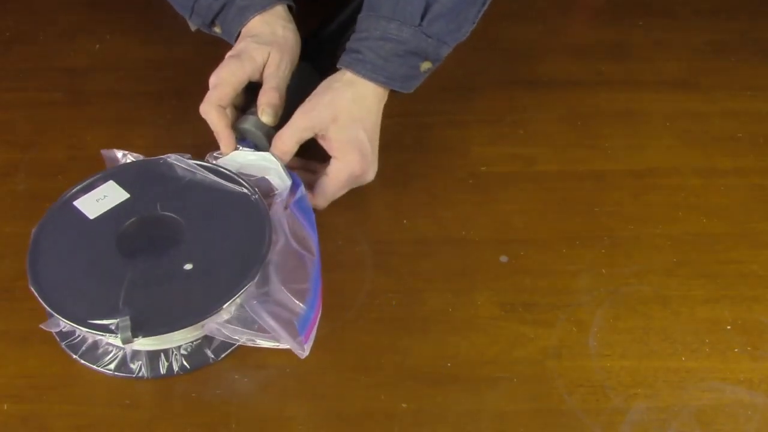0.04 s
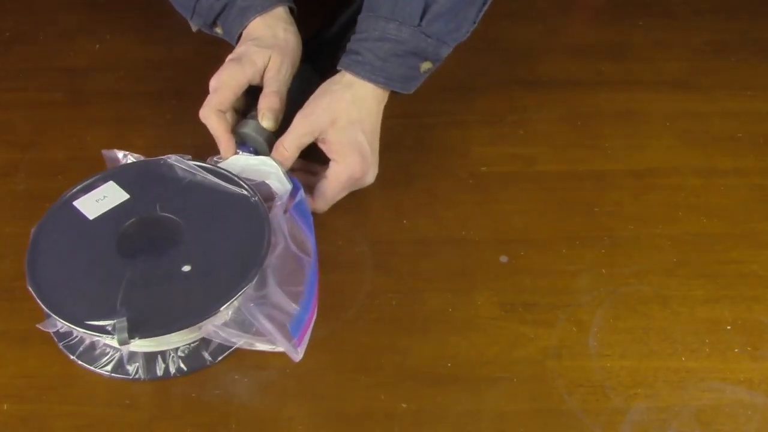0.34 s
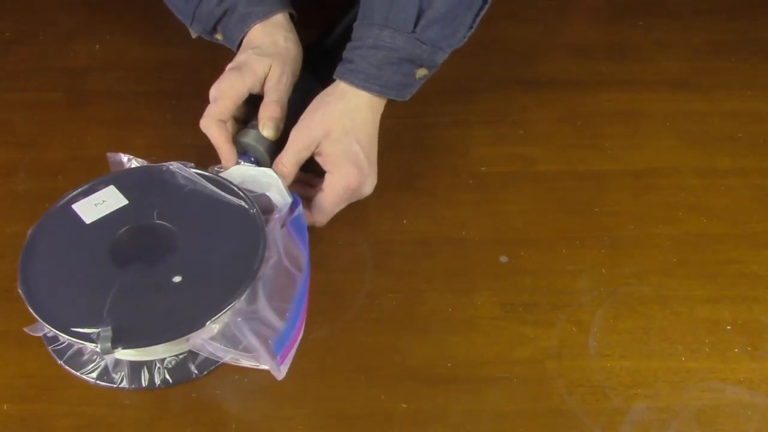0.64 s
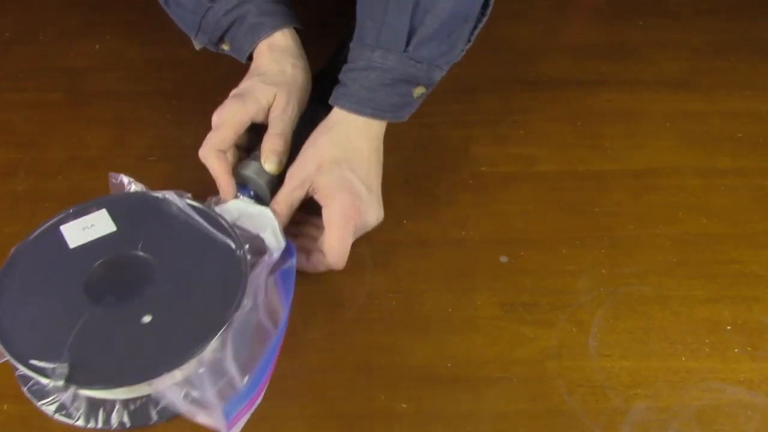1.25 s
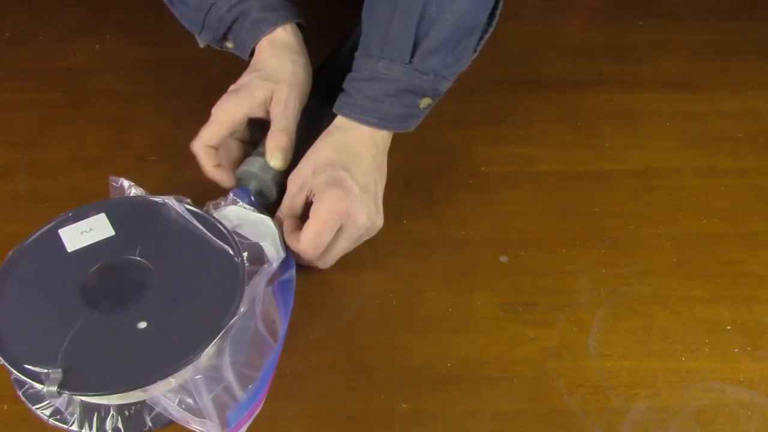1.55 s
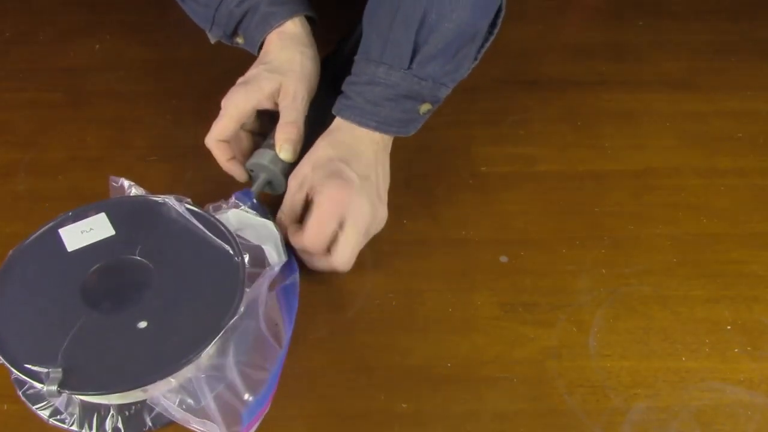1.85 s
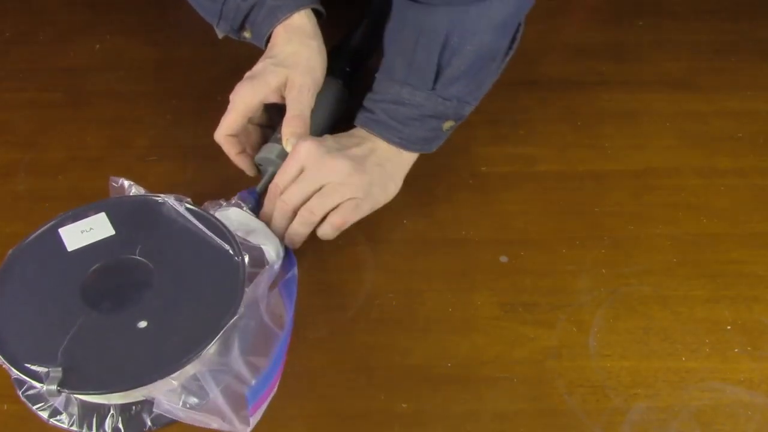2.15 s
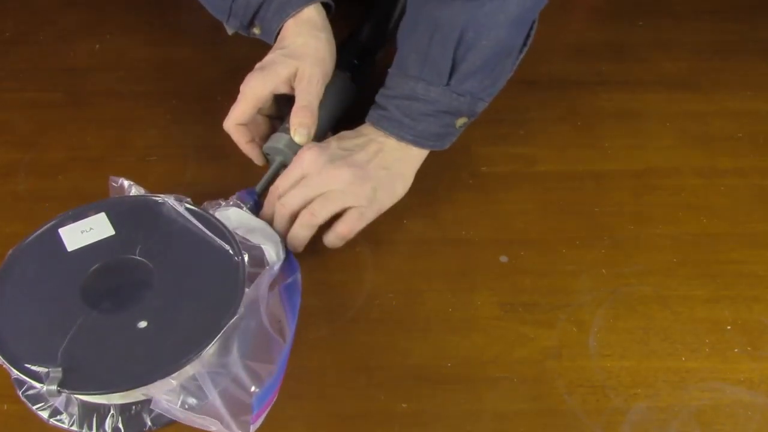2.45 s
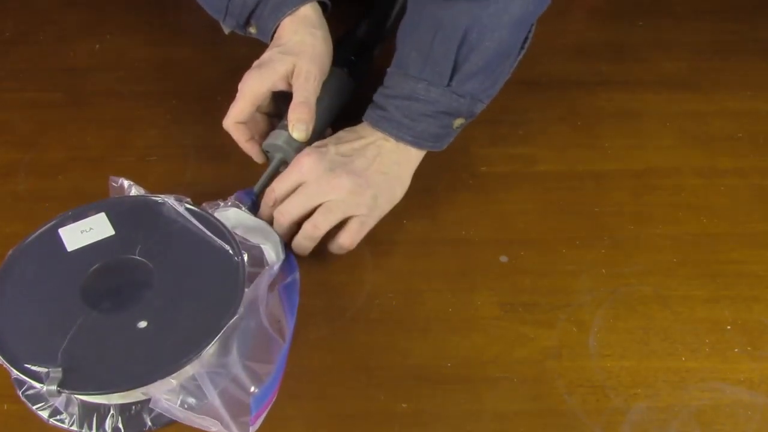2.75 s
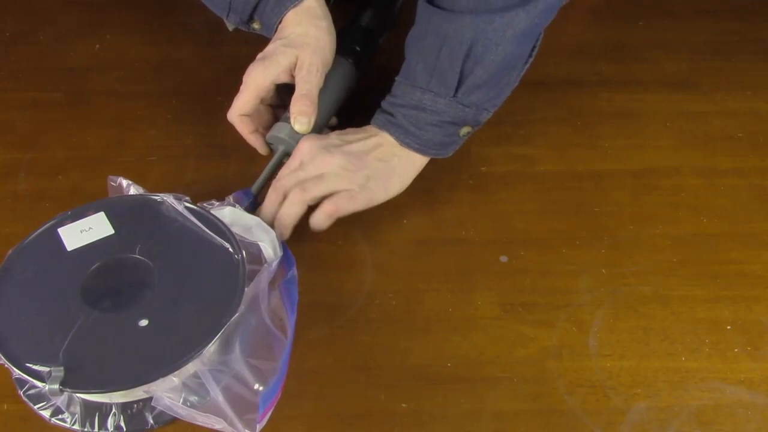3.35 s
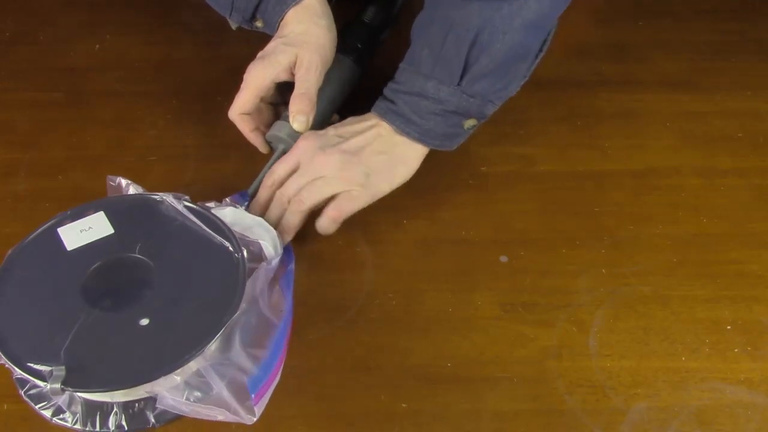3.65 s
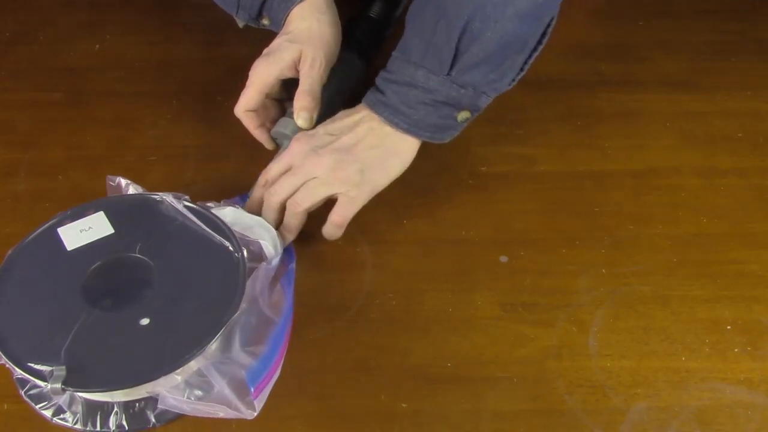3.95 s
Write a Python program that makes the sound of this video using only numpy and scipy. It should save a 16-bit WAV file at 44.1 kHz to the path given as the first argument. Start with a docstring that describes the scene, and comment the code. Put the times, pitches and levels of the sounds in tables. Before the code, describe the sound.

A vacuum cleaner roars for all four seconds with a thin whine that sinks very slightly, sucking air from a plastic bag indoors. Air hisses at the nozzle with faint whistles. From about 1.5 seconds the hiss broadens as the nozzle shifts, and short breathy whistles multiply, strongest from 3 seconds. Around 3.3 seconds something bumps softly on the table, and hands dully scuff the bag.

```python
"""A vacuum cleaner roars, whines and hisses in a small room, drawing the air out of a plastic bag on a table.
The roar comes from its exhaust and ringing housing, the whine from its fan, which slows a little.
Air hisses in past the nozzle; as hands shift it, the hiss changes colour and narrow gaps sing in
breathy whistles. Late on, the hands scuff the bag and something bumps softly on the table."""
import sys
import numpy as np
from scipy import signal
from scipy.fft import rfft, irfft
from scipy.io import wavfile
from scipy.ndimage import uniform_filter1d, map_coordinates

SR = 44100
rng = np.random.default_rng(int(sys.argv[2]) if len(sys.argv) > 2 else 0)


def dump(signal):
    """Clip the signal to [-1, 1] and save it as 16-bit WAV at the path in sys.argv[1]."""
    limited = np.clip(np.atleast_2d(signal).T, -1, 1)
    pcm = np.round(limited * 32767).astype(np.int16)
    wavfile.write(sys.argv[1], SR, pcm)


N = 176400  # 4 seconds

# How fast the motor spins. Each row: time in seconds, turns per second.
MOTOR_SPEED = [(0, 562.7), (.3, 562.1), (.85, 561.3), (1.15, 559.6), (1.8, 558.2), (2.3, 556.4),
               (2.48, 554.5), (4, 554.4)]
# How loud each part of the motor is. Each row: time in seconds, relative level in dB.
ROAR_LEVEL = [(0, -46), (.5, -47.5), (.9, -46.5), (1.35, -48), (1.7, -47), (2.1, -49), (2.6, -49.5),
              (3.3, -47.5), (4, -50)]
RUMBLE_LEVEL = [(0, -65.5), (.33, -62.5), (.45, -56.5), (.62, -61.5), (1.7, -59.5), (2.1, -61.5),
                (2.8, -64), (3, -60), (4, -62)]
SHAFT_LEVEL = [(0, -56.5), (.3, -57.5), (.85, -59.5), (1.2, -68.5), (1.8, -64.5), (2.2, -74), (4, -69)]
WHINE_LEVEL = [(0, -50.5), (.12, -49), (.3, -54.5), (.87, -52.5), (.95, -63), (1.15, -56.5), (1.46, -60),
               (1.8, -55), (2, -62), (2.32, -72), (2.38, -54.5), (2.48, -50.5), (2.62, -55.5), (3.3, -53),
               (3.4, -53), (3.46, -48), (3.7, -54.5), (3.76, -58), (4, -60)]
# Colour is a noise's mix of low and high. Each row: frequency in Hz, relative level in dB.
ROAR_COLOUR = [(400, -37), (520, -23), (620, -8), (690, -1), (860, -4), (1000, -4.5), (1200, -7),
               (1450, -11), (2100, -26), (4000, -39), (9000, -51)]
RUMBLE_COLOUR = [(20, -9), (38, -14), (60, -10.5), (76, -15), (98, 3), (115, -3.5), (132, -8), (152, -0.5),
                 (185, -5.5), (215, 6.5), (240, 1.5), (270, -1), (320, -10), (400, -12), (560, -5),
                 (1000, -44)]
# Where the motor housing and the nozzle's tube ring.
# Each row: pitch in Hz, rough width in Hz, relative level in dB.
HOUSING_RINGS = [(647.5, 16, -7.5), (694.6, 12.4, 1.5), (737.5, 12, 2.5), (801, 10.4, 0.5), (861, 16, 1.5),
                 (909, 11, -3.5), (977, 15.4, -4), (1039, 11.3, -3.5), (1133, 8.5, -2), (1176, 16, -6),
                 (1264, 17, -6)]
TUBE_RINGS = [(1174, 75, 2.5), (1960, 210, 2), (2550, 190, -3.5), (3260, 300, -1), (4030, 290, -2),
              (5820, 580, 2), (7500, 570, -1.5), (13550, 160, -11)]

# Hiss of the nozzle sitting flat, the nozzle tilted, and the tiniest leaks.
# Each row: frequency in Hz, relative level in dB.
SEATED_COLOUR = [(700, -26), (1500, -9), (2200, -14.5), (3000, -11), (3650, -9), (4100, -15), (4900, -8.5),
                 (5220, -8.5), (5490, 2.5), (5780, -5), (6500, -6), (7100, -8), (7450, -10.5),
                 (8450, -12.5), (8780, -9), (9600, -23.5), (11000, -22.5), (16000, -33)]
TILTED_COLOUR = [(700, -20), (1350, -5.5), (1650, -2), (2200, -3), (2800, -3.5), (3400, -2.5), (4000, -1),
                 (4600, -2), (5250, -1.5), (5750, -1), (6450, -1), (7400, -1.5), (8300, -4.5), (9200, -3.5),
                 (11000, -8.5), (12200, -15), (16000, -25)]
FIZZ_COLOUR = [(6000, -9), (9500, -19.5), (12000, 11.5), (13400, 3), (14400, 9), (15700, 2.5)]
# How loud each hiss is. Each row: time in seconds, relative level in dB.
SEATED_LEVEL = [(0, -43.5), (.5, -44.5), (.8, -44), (1.1, -44.5), (1.48, -47.5), (1.6, -50.5),
                (1.85, -48.5), (2.05, -49.5), (2.35, -51.5), (2.6, -54), (4, -63)]
TILTED_LEVEL = [(0, -49), (.6, -62), (1.5, -52.5), (1.62, -45), (1.9, -47.5), (2.05, -51.5), (2.35, -51),
                (2.7, -48), (2.9, -44), (3.15, -44.5), (3.45, -44), (3.65, -46), (4, -46)]
FIZZ_LEVEL = [(0, -57), (.22, -55), (.45, -58), (.8, -59), (1.5, -62), (1.67, -60), (1.92, -60),
              (2.02, -64), (2.45, -62), (2.75, -60), (2.97, -55), (3.2, -56), (3.5, -53.5), (4, -58)]
TUBE_LEVEL = [(0, -75), (2.7, -62), (2.95, -56), (3.25, -54.5), (3.45, -45), (3.7, -46.5), (3.85, -46),
              (4, -45.5)]  # rises as the tube's mouth comes free
# Whistling gaps. Each row: start and end in seconds, pitch in Hz, rough width in Hz, level in dB.
WHISTLES = [ (-.1, 0.36, 3700, 300, -54.5), (.52, 1.5, 11700, 220, -67.5), (0.67, 0.845, 5760, 220, -48.5),
            (.7, 1.1, 5830, 120, -51.5), (1.527, 1.656, 7950, 500, -56), (1.582, 1.71, 1480, 600, -52.5),
            (1.62, 2.02, 8500, 1100, -59), (1.98, 2.12, 10400, 300, -62), (2.052, 2.24, 10000, 500, -58.5),
            (2, 2.202, 8200, 600, -57.5), (2.224, 2.424, 9100, 700, -54.5), (2.453, 2.805, 8800, 500, -55),
            (2.425, 2.686, 7150, 500, -54), (2.5, 2.95, 10060, 1000, -57.5), (2.815, 2.943, 7400, 600, -51),
            (2.7, 3.202, 10800, 450, -56), (2.914, 2.994, 10970, 260, -45.5),
            (2.924, 2.99, 10340, 180, -49), (2.92, 3, 12500, 400, -57), (2.95, 3.256, 6700, 170, -52),
            (2.944, 3.426, 7020, 320, -49.5), (2.958, 3.013, 1920, 150, -44),
            (2.956, 3.019, 2300, 200, -52), (3.07, 3.232, 11150, 700, -52.5), (3.014, 3.32, 1920, 190, -54),
            (3.287, 3.663, 1900, 170, -47.5), (3.373, 3.437, 1950, 110, -45), (3.384, 3.46, 2300, 160, -51),
            (3.388, 3.54, 11300, 400, -54), (3.44, 3.535, 3900, 170, -48), (3.66, 3.79, 2665, 140, -50.5),
            (3.69, 3.8, 3320, 200, -49), (3.76, 3.87, 7350, 400, -49), (3.75, 3.86, 13150, 400, -60),
            (3.943, 4.05, 3230, 258, -47), (3.963, 4.05, 14400, 250, -54)]

# How loud the scuffing on the bag is. Each row: time in seconds, level in dB.
SCUFF_LEVEL = [(0, -71), (2.85, -91), (3.18, -63.5), (3.3, -57), (3.42, -51.5), (3.55, -61.5), (3.7, -57.5),
               (4, -63)]
# Its dull colour. Each row: frequency in Hz, relative level in dB.
SCUFF_COLOUR = [(80, -25), (200, -8), (300, -8.5), (420, -7), (560, 3), (1000, -41), (2500, -41)]
# Bumps on the table. Each row: start in seconds, relative level in dB.
BUMPS = [(3.288, -34), (3.305, -38.5), (3.338, -44)]
# The table's own notes. Each row: pitch in Hz, relative level in dB, seconds to fade by 60 dB.
TABLE_NOTES = [(222, -2, 0.17), (256.5, 1.5, 0.16), (306, -2, 0.12)]

# How alike the two ears hear a noise. Each row: frequency in Hz, likeness from 0 to 1 (the same).
MOTOR_ALIKE = [(60, 0.95), (250, 0.92), (600, 0.78), (1500, 0.84), (5000, 0.7)]
NOZZLE_ALIKE = [(1500, 0.84), (3500, 0.84), (6000, 0.89), (9000, 0.99), (12000, 1)]

FAN_BLADES = 9
HUM_HZ, HUM_DB = 121.2, -70
TOP_HZ = 15750


def amp(db):
    """Turn decibels into a number to multiply by."""
    return 10 ** (np.asarray(db) / 20)


def unit(x):
    """Scale a signal to an average (rms) size of 1."""
    return x / np.sqrt(np.mean(x ** 2) + 1e-20)


def along(points, hz):
    """Read a frequency table between its rows, spacing octaves evenly."""
    freqs, values = np.transpose(points)
    return np.interp(np.log(hz + 1), np.log(freqs + 1), values)


def curve(rows):
    """Turn a time table into one value per sample."""
    times, values = np.transpose(rows)
    return np.interp(np.arange(N) / SR, times, values)


def wobble(rate):
    """A smooth curve through `rate` random values a second."""
    return map_coordinates(rng.standard_normal(int(N * rate / SR) + 4), [np.arange(N) * rate / SR])


def noise(gain, alike):
    """Stereo noise, with gain(hz) setting how strong each frequency is."""
    hz = np.fft.rfftfreq(N, 1 / SR)
    spread = np.arccos(np.clip(along(alike, hz), -1, 1)) / 2
    spectrum = rfft(rng.standard_normal((2, N))) * gain(hz)
    mid, side = irfft(spectrum * [np.cos(spread), np.sin(spread)], N)
    return unit(np.array([mid + side, mid - side]))


def coloured_noise(colour, alike):
    """Noise shaped by a colour table."""
    return noise(lambda hz: amp(along(colour, hz)), alike)


def resonance(hz, centre, width):
    """A peak that favours the frequencies near its centre."""
    return 1 / (1 + ((hz - centre) / (0.62 * width)) ** 2)


def ringing_noise(rings, alike):
    """Noise gathered around the pitches where an object rings."""
    return noise(lambda hz: sum(amp(db) * resonance(hz, pitch, width) for pitch, width, db in rings), alike)


def tone(hz, waver_db, apart):
    """A wavering tone that reaches the two ears slightly differently."""
    phase = 2 * np.pi * np.cumsum(hz) / SR
    level = amp(waver_db * wobble(16))
    mid = unit(level * np.sin(phase + 0.15 * wobble(30)))
    side = apart * wobble(5) * np.cos(phase)
    return np.array([mid + side, mid - side])


def motor():
    """The exhaust roars, the housing rings and the machine rumbles; shaft, fan and mains add tones."""
    exhaust = coloured_noise(ROAR_COLOUR, MOTOR_ALIKE)
    housing = ringing_noise(HOUSING_RINGS, MOTOR_ALIKE)
    roar = amp(curve(ROAR_LEVEL) - 2.5) * (exhaust + housing)
    rumble = amp(curve(RUMBLE_LEVEL) + 1.2 * wobble(6.5)) * coloured_noise(RUMBLE_COLOUR, MOTOR_ALIKE)
    speed = curve(MOTOR_SPEED)
    shaft = amp(curve(SHAFT_LEVEL)) * tone(speed, waver_db=1.3, apart=0.66)
    whine = amp(curve(WHINE_LEVEL)) * tone(FAN_BLADES * speed, waver_db=1.15, apart=0.45)
    hum = amp(HUM_DB) * tone(np.full(N, HUM_HZ), waver_db=1.8, apart=0.2)
    return roar + rumble + shaft + whine + hum


def rush(colour, patchy_db):
    """Swirling air at the nozzle: noise with drifting louder and softer patches."""
    spectra = signal.stft(coloured_noise(colour, NOZZLE_ALIKE), nperseg=512)[2]
    patches = rng.standard_normal(spectra.shape[1:])
    patches = uniform_filter1d(patches, size=5, axis=0)  # smooth over frequency
    patches = uniform_filter1d(patches, size=22, axis=1)  # smooth over time
    air = signal.istft(spectra * amp(patchy_db * unit(patches)), nperseg=512)[1]
    return unit(air[:, :N])


def reflections(x):
    """Weak, quick echoes off table, hands and walls lift some frequencies and dip others."""
    hz = np.fft.rfftfreq(N, 1 / SR)
    delays_s = rng.uniform(0.002, 0.016, size=10)
    echoes = 0.11 * np.exp(-2j * np.pi * delays_s[:, None] * hz).sum(axis=0)
    return irfft(rfft(x) * unit(np.abs(1 + echoes)), N)


def suction():
    """Air hisses in past the nozzle and rings its tube; the colour follows how it sits on the bag."""
    seated = amp(curve(SEATED_LEVEL)) * rush(SEATED_COLOUR, patchy_db=1.1)
    tilted = amp(curve(TILTED_LEVEL)) * rush(TILTED_COLOUR, patchy_db=1.7)
    fizz = amp(curve(FIZZ_LEVEL)) * rush(FIZZ_COLOUR, patchy_db=1.0)
    tube = amp(curve(TUBE_LEVEL)) * ringing_noise(TUBE_RINGS, NOZZLE_ALIKE)
    flicker = amp(0.28 * wobble(29.92))
    return flicker * reflections(seated + tilted + fizz + tube)


def whistles():
    """Each gap that opens sings as a narrow band of noise until it closes."""
    t, out = np.arange(N) / SR, np.zeros((2, N))
    for start, end, pitch, width, db in WHISTLES:
        fade_s = 0.014 + 0.25 * (end - start)  # long whistles swell and fade more slowly
        swell = np.clip((t - start) / fade_s + 0.5, 0, 1)
        fade = np.clip((end - t) / fade_s + 0.5, 0, 1)
        # Squaring narrows the peak, so it is widened first.
        band = noise(lambda hz: resonance(hz, pitch, 1.68 * width) ** 2, NOZZLE_ALIKE)
        out += swell * fade * amp(db) * band
    return out


def scuff():
    """Hands and nozzle rub on the bag with a dull noise."""
    return amp(curve(SCUFF_LEVEL)) * coloured_noise(SCUFF_COLOUR, MOTOR_ALIKE)


def bumps(attack_s=0.005):
    """Each soft bump sets the table's low notes ringing briefly."""
    out = np.zeros(N)
    for start, db in BUMPS:
        t = np.maximum(np.arange(N) / SR - start, 0)
        ring = sum(amp(level - 60 * t / fade_s) * np.sin(2 * np.pi * hz * t)
                   for hz, level, fade_s in TABLE_NOTES)
        out += amp(db) * ring * (1 - np.exp(-t / attack_s))
    return out


def scene():
    """Add up the machine in the room and the sounds at the table."""
    return motor() + suction() + whistles() + scuff() + bumps()


def record(dry):
    """Cut away the highest treble, above TOP_HZ."""
    return irfft(rfft(dry) * (np.fft.rfftfreq(N, 1 / SR) < TOP_HZ), N)


dry = scene()
out = record(dry)
dump(out)
```